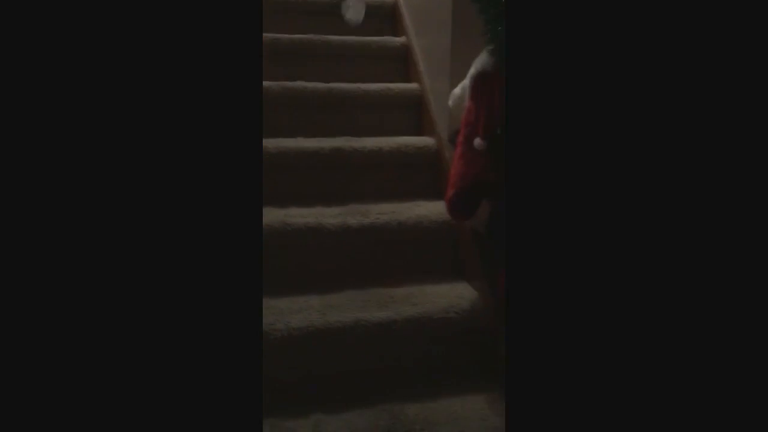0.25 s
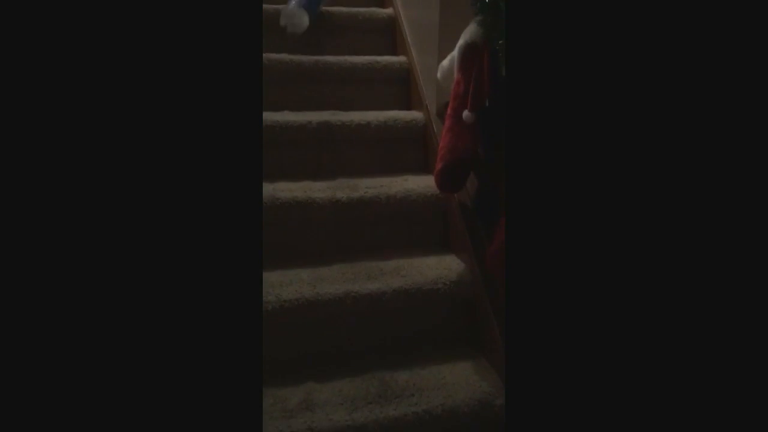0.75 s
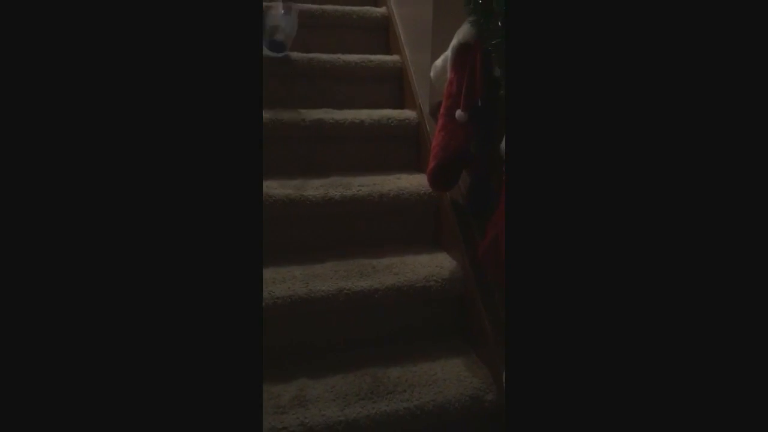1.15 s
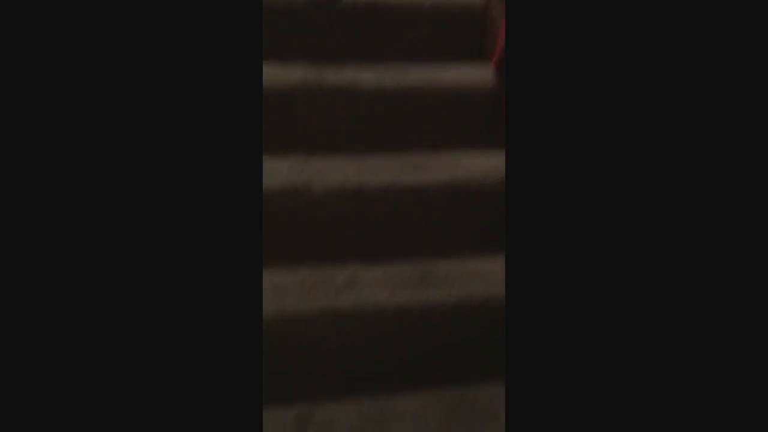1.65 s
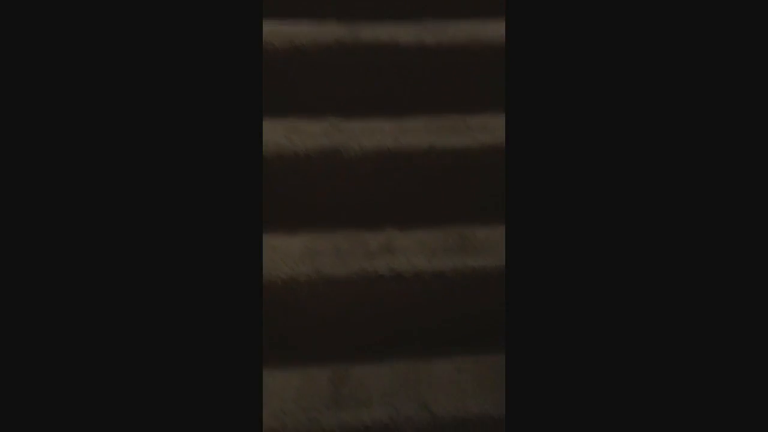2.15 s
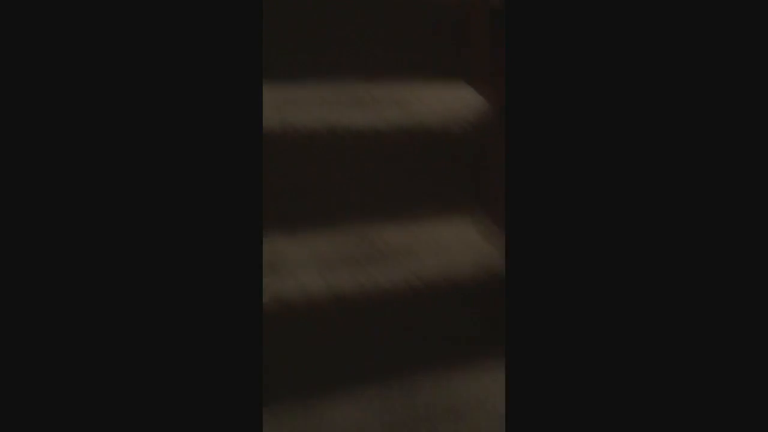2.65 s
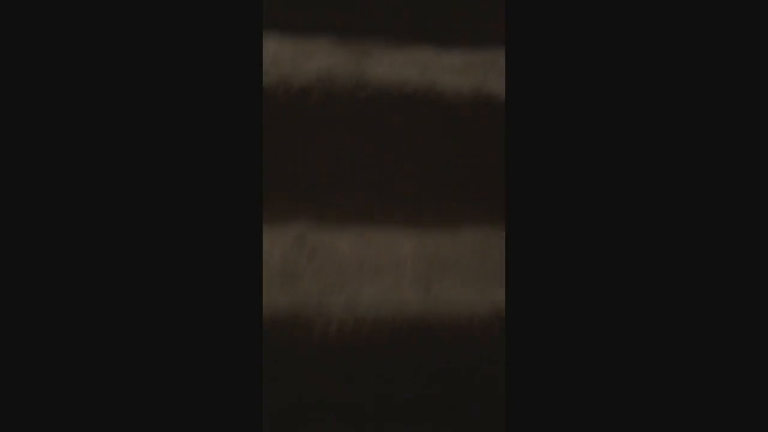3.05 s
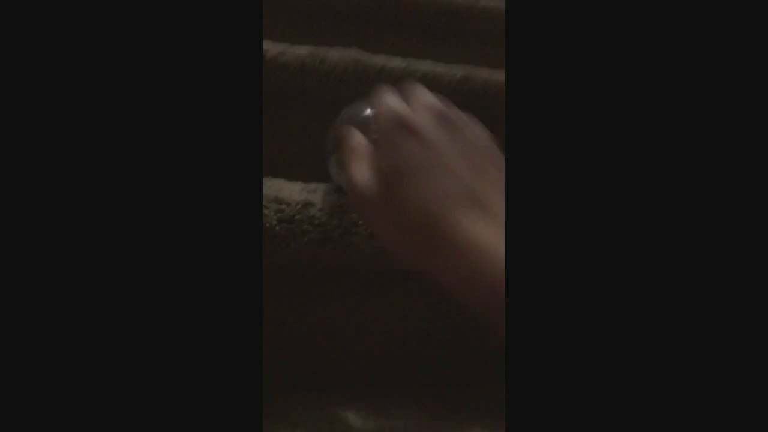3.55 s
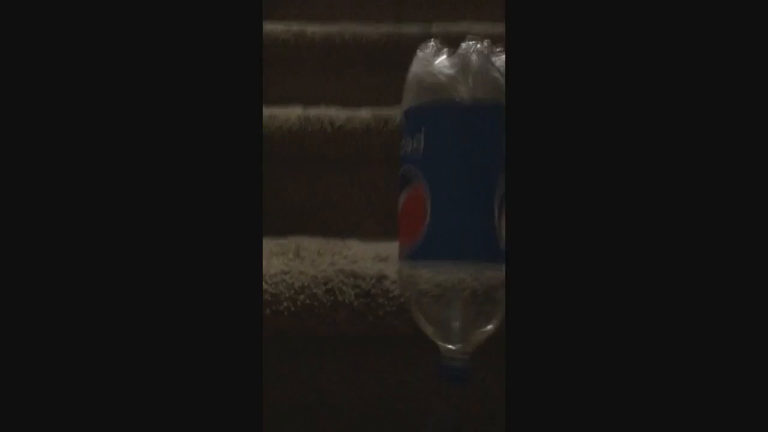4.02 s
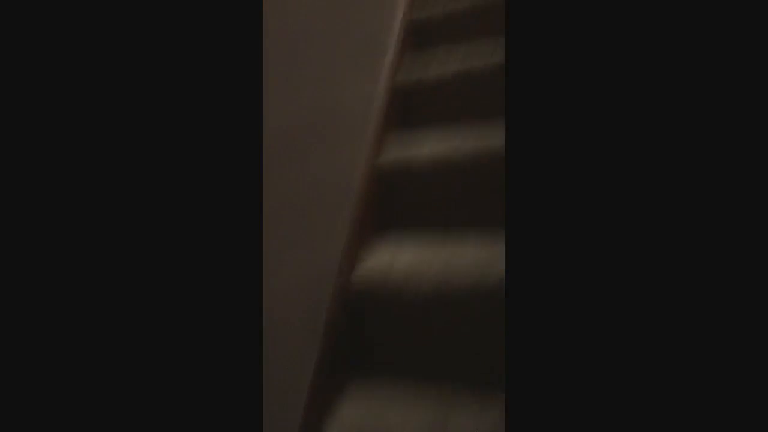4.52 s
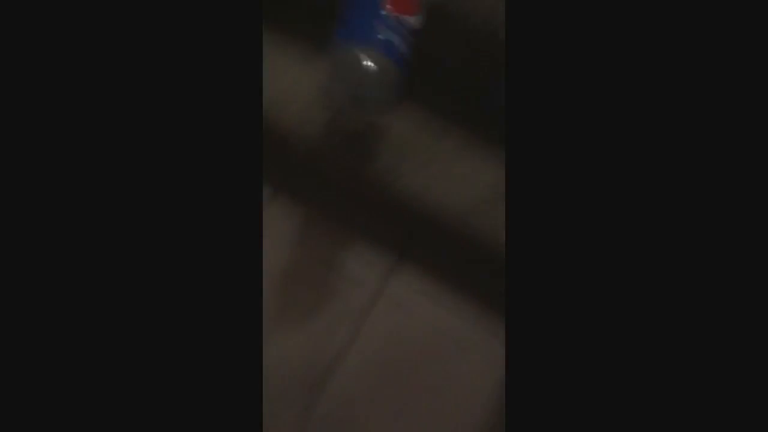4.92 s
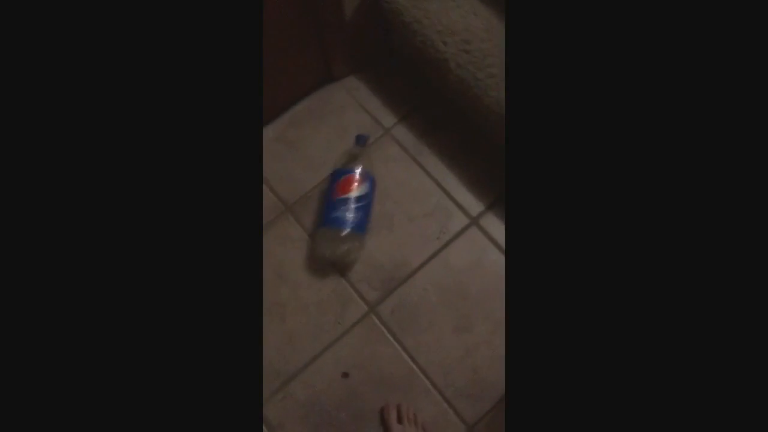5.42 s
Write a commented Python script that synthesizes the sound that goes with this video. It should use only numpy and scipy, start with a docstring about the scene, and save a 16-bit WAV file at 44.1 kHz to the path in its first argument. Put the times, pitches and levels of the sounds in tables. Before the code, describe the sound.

A part-filled plastic bottle tumbles down carpeted wooden stairs with soft, hollow bumps and faint sloshes. Bare feet thud up a few steps, making the staircase rumble. The bottle is grabbed with a sharp crackle and thrown down again, knocking and sloshing over the steps before hitting tile with two loud smacks. The microphone is close and hand-held, in a quiet house.

```python
"""A carpeted wooden staircase in a quiet house. A part-filled plastic bottle tumbles down; bare feet
climb after it, scuffing the carpet, a hand grabs it, and it is thrown down again to land on tiles.
Each impact excites damped modes of the treads, the hollow beneath and the bottle wall, and leaves the
stairs rumbling. The liquid slaps, runs back and traps bubbles that resonate. Cloth brushes past the
hand-held microphone, and the sharper sounds reverberate in the stairwell."""
import sys
import numpy as np
from scipy import signal
from scipy.fft import rfft, irfft
from scipy.io import wavfile
from scipy.ndimage import uniform_filter1d

SR = 44100
rng = np.random.default_rng(int(sys.argv[2]) if len(sys.argv) > 2 else 0)


def pcm_store(signal):
    """Save signal as 16-bit PCM."""
    levels = np.round(np.clip(np.atleast_2d(signal), -1, 1) * 32767)
    wavfile.write(sys.argv[1], SR, levels.astype(np.int16).T)


N = 250488

# blows of bottle and feet: t/s, tread peak/dB, tread f/Hz, t60/s, hollow peak/dB, hardness (0-1)
BLOWS = [(0.0, -49, 77.5, .11, -30.5, 0.67), (0.046, -32, 59.6, 0.051, -35, 0.64),
         (0.382, -23, 72.5, 0.13, -42, 0.4), (0.688, -42, 58.6, 0.18, -70, 0.56),
         (0.922, -23, 67, 0.25, -40, 0.62), (1.365, -19.5, 84, 0.07, -21, 0.34),
         (1.49, -38, 70.4, 0.088, -42, 0.3), (2.497, -47.5, 106, 0.074, -48, 0.8),
         (2.67, -37, 135, 0.18, -52, 0.2), (2.757, -11.5, 86.6, 0.071, -28, 0.28),
         (2.806, -22.5, 89.5, 0.12, -49, 0.8), (2.837, -25.5, 67.4, 0.31, -53, 0.7),
         (3.306, -39, 54, 0.075, -61, .45), (3.406, -24, 51.3, 0.33, -37, 0.35),
         (3.435, -18, 45, 0.42, -33.5, 0.75), (3.456, -16.5, 59.6, 0.043, -33, .45),
         (3.769, -24, 58.6, 0.17, -52, 0.47), (4.106, -57, 51.1, .12, -31, 0.94),
         (4.335, -30, 92.7, 0.19, -27.5, 0.2), (4.35, -20, 101, .081, -27.5, 0.65),
         (4.403, -4.5, 110, 0.053, -18, 0.94), (4.441, -25.5, 117, 0.063, -30.5, 0.2),
         (4.52, -30.5, 50.3, .15, -59, 0.24), (4.645, -23, 105, 0.077, -41, 0.53),
         (4.7, -28.5, 82, 0.044, -42, 0.9), (4.727, -22, 116, 0.079, -17.5, 0.22),
         (4.768, -24.5, 75, 0.21, -28, 0), (4.827, -26, 87, 0.052, -31, .45),
         (4.9, -40, 57.3, 0.072, -25.5, 0.8), (4.923, -19.5, 106, 0.038, -32, .55),
         (4.951, -17, 86, 0.039, -39, .03), (4.996, -24, 83.7, 0.15, -52, 0.76),
         (5.111, -20, 91, 0.045, -23, .7), (5.2728, -15, 100.3, 0.36, -11, 0.43),
         (5.382, -13, 111.4, 0.11, -15, 0.85), (5.518, -34, 108.6, 0.45, -41, 0.43),
         (5.592, -32, 94, 0.34, -44, 0.8)]
# liquid slaps in the bottle and feet scuffing the carpet: t/s, level/dB, t60/s, tilt/(dB per octave)
SLAPS_AND_SCUFFS = [(0.049, -37.5, 0.2, -3), (.078, -43.5, 0.47, -1.5), (.39, -41, 0.63, -0.25),
                    (.687, -47, 0.22, -5), (0.829, -51, 0.36, 3), (0.9291, -39.5, 0.59, -.5),
                    (1.1685, -54, 0.16, 0), (1.229, -56, 0.11, 4), (1.3648, -45.5, 1, 3),
                    (1.5042, -46, 0.19, 2), (1.5431, -46.5, 0.1, 1.5), (1.644, -39.5, 0.025, 1),
                    (1.7645, -45.5, 0.096, 4.5), (1.8587, -45, 0.024, 2.5), (2.7655, -50.5, 0.13, 2),
                    (3.2962, -46, .058, 3.5), (3.428, -50, .1, 1.2), (3.494, -53, 0.2, 2),
                    (3.8, -46.5, 0.13, 3), (4.0062, -55.5, .32, 6), (4.0557, -24.5, .13, 2),
                    (4.105, -26, 0.084, 1.5), (4.1909, -48, 0.16, -5), (4.2168, -38, 0.17, -0.5),
                    (4.2972, -42.5, .25, -0.5), (4.4009, -17, 0.082, -5.5), (4.4578, -44, 0.13, 4),
                    (4.6494, -26, .11, -2), (4.709, -35.5, 0.14, -0.5), (4.735, -27.5, .36, -1.1),
                    (5.1173, -34.5, 0.57, 2.5), (5.218, -29.5, .06, 3), (5.2762, -12, 0.12, -7),
                    (5.3798, -11.5, 0.063, 0.6), (5.5149, -26, 0.052, 6), (5.5792, -35.5, 0.17, 1),
                    (5.6226, -34.5, 0.041, -0.3), (5.6542, -38.5, 0.069, -4.5)]
# spectrum of moving liquid and brushed carpet: f/Hz, relative level/dB
SWISH_SPECTRUM = [(180, -4.5), (300, -8.5), (663, -10.5), (781, -7), (1140, -8.5), (1300, -9.5),
                  (2070, -10), (2830, -10.5), (4880, -15.5), (5950, -13.5), (7750, -19), (12700, -25),
                  (15500, -25.5)]


def gain_of(db):
    """Amplitude ratio of a level in dB."""
    return 10 ** (np.asarray(db) / 20)


def unit_rms(x):
    """Normalisation to unit mean power."""
    return x / np.sqrt(np.mean(x ** 2) + 1e-20)


def at_frequency(points, hz):
    """Interpolation of a table on a logarithmic frequency axis."""
    f, value = np.transpose(points)
    return np.interp(np.log(hz + 1), np.log(f + 1), value)


def add(mix, s, db, sound):
    """Superposition: the sound enters the mix at s seconds with peak level db."""
    part = mix[max(round(s * SR), 0):][:len(sound)]
    part += gain_of(db) * sound[:len(part)] / np.abs(sound).max()


def coloured_noise(spectrum):
    """Spectral shaping of white noise, at unit rms."""
    white = rfft(rng.standard_normal(N))
    return unit_rms(irfft(white * gain_of(at_frequency(spectrum, np.fft.rfftfreq(N, 1 / SR))), N))


def decaying_power(s, db, t60):
    """Incoherent addition: the powers of exponential decays starting at the times s are summed."""
    starts = np.zeros(N)
    np.add.at(starts, np.round(np.asarray(s) * SR).astype(int), gain_of(db) ** 2)
    return signal.lfilter([1], [1, -gain_of(-2 * 60 / (t60 * SR))], starts)


def house_hush():
    """Ambient noise: a stationary floor, strongest in the deep bass."""
    # spectrum of the quiet house: f/Hz, relative level/dB
    spectrum = [(12, -30), (20, 18), (70, -18), (282, -4), (427, -15), (519, -11), (1500, -21), (2150, -22),
                (4810, -28), (5850, -25), (10500, -28), (13100, -23), (15500, -32)]
    return gain_of(-63) * coloured_noise(spectrum)


def stairwell(x):
    """Reverberation: sparse reflections of random sign, each band decaying at its own rate."""
    # reverberation time: f/Hz, t60/s
    decay_times = [(200, 0.08), (1000, 0.39), (4000, 0.28), (12000, 0.35)]
    reflections = np.zeros(SR // 2)
    slots = np.arange(150, SR // 2 - 20, 20)
    arrivals = slots + rng.integers(0, 20, len(slots))
    reflections[arrivals] = rng.choice([-1., 1.], len(slots))
    hz, t, bands = signal.stft(reflections, SR, nperseg=256)
    decay = gain_of(-60 * t / at_frequency(decay_times, hz)[:, None])
    tail = signal.istft(bands * decay, SR, nperseg=256)[1]
    return signal.fftconvolve(x, tail / np.linalg.norm(tail))[:N]


def cloth_rustle():
    """Friction noise: cloth brushing close by swells and fades with each stroke."""
    # strokes: t/s of the peak, level/dB, swell/s, fade/s
    strokes = [(2.3, -64.5, 0.087, 0.076), (3.02, -70.5, 0.048, 0.06), (3.51, -61.5, .015, 0.039)]
    # spectrum of rubbing cloth: f/Hz, relative level/dB
    spectrum = [(180, -17), (1500, -3), (2200, 8), (2700, -6), (3400, 4), (4600, -24), (6500, -3),
                (15500, -20.5)]
    t = np.arange(N) / SR
    envelope = sum(gain_of(db) * np.exp(-((t - s) / np.where(t < s, swell, fade)) ** 2)
                   for s, db, swell, fade in strokes)
    return envelope * coloured_noise(spectrum)


def stair_rumble():
    """Forced vibration: moving weight and blows shake the stairs, a light load at a higher pitch."""
    # rumble under moving weight, blows aside: t/s, level/dB
    loading = [(0.0, -32.5), (.19, -57.5), (1.1, -61.5), (1.5, -41), (1.71, -59.5), (1.96, -58.5),
               (2.7, -54), (3.32, -54), (3.64, -49.5), (3.81, -55.5), (4.38, -53.5), (4.6, -48),
               (4.87, -33), (4.97, -47), (5.09, -35.5), (5.24, -41), (5.51, -66), (5.68, -34.5)]
    # response to a heavy load: f/Hz, relative level/dB
    heavy_spectrum = [(12, -14), (20, 5), (59, 13.5), (119, -8), (223, -14), (392, -39), (435, -11),
                      (483, -60), (700, -27), (910, -61), (1540, -120)]
    # response to a light load: f/Hz, relative level/dB
    light_spectrum = [(12, -51), (20, -15.5), (87, 2), (112, -5.5), (130, -15), (161, -6), (195, -20),
                      (353, -19.5), (700, -44.5), (910, -41), (1540, -120)]
    heavy_hz, light_hz = 49.7, 154  # a blow's tread note divides its power between the two spectra
    s, db, hz = np.transpose(BLOWS)[:3]
    light = np.clip(np.log(hz / heavy_hz) / np.log(light_hz / heavy_hz), 1e-3, 1 - 1e-3)
    load_power = gain_of(np.interp(np.arange(N) / SR, *np.transpose(loading))) ** 2
    out = np.zeros(N)
    for blow_share, load_share, spectrum in ((1 - light, 0.56, heavy_spectrum),
                                             (light, 0.44, light_spectrum)):
        blow_power = decaying_power(s, db - 23 + 10 * np.log10(blow_share), t60=0.74)
        power = load_share * load_power + uniform_filter1d(blow_power, size=900)
        out += np.sqrt(abs(power)) * coloured_noise(spectrum)
    return out


def grainy_hiss(per_s, spread_db):
    """Shot noise over hiss: tiny grains of uneven size arrive at random; some ring on like bubbles."""
    sizes = gain_of(spread_db * np.minimum(rng.exponential(1, N), 3.5))
    impacts = sizes * (rng.random(N) < per_s / SR)
    band, out = rng.integers(0, 48, N), np.zeros(N)
    for k, hz in enumerate(np.geomspace(900, 14000, 48)):
        cycles = 7.0 if k % 4 == 0 and hz < 5500 else 1.1
        t = np.arange(round(4 * cycles * SR / hz)) / SR
        chirp = np.sin(2 * np.pi * hz * t * (1 + 0.0057 * hz * t))
        grain = chirp * np.exp(-hz * t / cycles) * np.minimum(hz * t, 1) * hz / 3000
        out += signal.oaconvolve(impacts * (band == k), grain)[:N]
    return 0.37 * unit_rms(out) + rng.standard_normal(N)


def swish_timbre(x, tilt_db, patchy_db):
    """Time-varying filtering: the swish spectrum, tilted in dB per octave, with drifting patches."""
    hz, t, frames = signal.stft(x, SR, nperseg=512, noverlap=384)
    patches = uniform_filter1d(rng.standard_normal(frames.shape), size=6, axis=0)
    patches = unit_rms(uniform_filter1d(patches, size=10, axis=1))
    tilt = np.interp(t, np.arange(len(x)) / SR, tilt_db * np.ones(len(x)))
    octaves = np.log2((hz[:, None] + 200) / 4000)
    shape_db = at_frequency(SWISH_SPECTRUM, hz)[:, None] + octaves * tilt + patchy_db * patches
    return signal.istft(frames * gain_of(shape_db), SR, nperseg=512, noverlap=384)[1][:len(x)]


def swish():
    """Flow and friction noise: liquid runs and carpet is brushed; each slap or scuff leaves a tail."""
    # moving liquid and brushed carpet: t/s, level/dB, tilt/(dB per octave)
    movement = [(0.0, -57, 2), (.3, -67, 0.5), (.8, -74, 0.5), (1.1, -67.5, -1.5), (1.24, -53.5, -0.5),
                (1.36, -66, -1), (1.45, -53.5, 2.5), (1.7, -56.5, -3.5), (1.9, -60.5, 1.9), (1.96, -77, 7),
                (2.31, -58.5, 7), (2.44, -72.5, 1), (3.24, -69, 0.5), (3.3, -55, -5), (3.34, -87, 7),
                (3.39, -70, -4.5), (3.43, -60, -2), (3.7, -72.5, 2), (3.94, -81, 5.5), (4.052, -42.5, -1.5),
                (4.13, -52.5, 3.3), (4.39, -52, -1.5), (4.478, -33.5, 2), (4.599, -61, 0.5),
                (4.7, -40.5, 3), (4.88, -54, 3.5), (5.04, -50.5, 6.5), (5.11, -57, 0.5), (5.18, -37, 2.5),
                (5.22, -46.5, -2.5), (5.36, -52, -2), (5.57, -48, 1.5), (5.68, -53.5, -0.5)]
    s, db, tilt_db = np.transpose(movement)
    burst_s, burst_db = np.transpose(SLAPS_AND_SCUFFS)[:2]
    t = np.arange(N) / SR
    noise = swish_timbre(grainy_hiss(per_s=3800, spread_db=3.5), np.interp(t, s, tilt_db), patchy_db=-1)
    power = gain_of(np.interp(t, s, db)) ** 2 + decaying_power(burst_s, burst_db - 13.5, t60=0.21)
    return noise * np.sqrt(power / (uniform_filter1d(noise ** 2, size=8000) + 1e-12))


def slaps_and_scuffs():
    """Inertia and friction: liquid slaps in the bottle and feet scuff the carpet, in decaying bursts."""
    out, t = np.zeros(N), np.arange(SR // 3) / SR
    hiss = grainy_hiss(per_s=5000, spread_db=2.0)
    for s, db, t60, tilt_db in SLAPS_AND_SCUFFS:
        grains = np.resize(hiss[round(s * SR / 2):], len(t))
        burst = unit_rms(swish_timbre(grains, tilt_db, patchy_db=4.0))
        rise_s = 0.0012 * np.exp(-0.03 * db)  # weaker bursts rise more slowly
        envelope = gain_of(db - 60 * t / t60) * np.minimum(t / rise_s, 1)
        start = round(s * SR)
        out[start:][:len(t)] += (burst * envelope)[:N - start]
    return out


def bubbles():
    """Bubble resonance: trapped air pulsates in a short rising note, blurred by a smaller neighbour."""
    # single bubbles: t/s, peak level/dB, starting f/Hz
    notes = [(0.0638, -33, 1600), (0.3563, -50, 2580), (0.849, -50.5, 925), (0.9444, -34, 1940),
             (1.139, -42.5, 1990), (1.172, -41.5, 1410), (1.2268, -40, 1710), (1.3136, -43.5, 4350),
             (1.5075, -32.5, 2740), (3.4994, -52, 2200), (4.1924, -39.5, 1080), (4.3098, -31, 2470),
             (4.314, -31, 4140), (4.3247, -28.5, 1070), (4.608, -39, 1430), (5.239, -22, 1350)]
    out = np.zeros(N)
    for s, db, hz in notes:
        t = np.arange(round(40 * SR / hz)) / SR
        phase = 2 * np.pi * hz * t * (1 + 0.0041 * hz * t)
        pair = np.sin(phase) + 0.34 * np.sin(1.186 * phase)
        add(out, s, db, pair * np.exp(-hz * t / 3.4) * (1 - np.exp(-hz * t / 0.68)))
    return out


def snaps():
    """Transient excitation: a click and a noise burst drive a resonance of plastic, joint or grit."""
    # hard snaps: t/s, peak level/dB, centre f/Hz, quality factor Q
    cracks = [(0.0752, -25.5, 4450, 12), (0.3882, -33.5, 1310, 2.4), (0.926, -33.5, 1960, 0.85),
              (1.3666, -31.5, 2140, 12), (1.912, -39, 3020, 0.38), (2.4638, -31, 1360, 0.77),
              (2.7755, -23.5, 1290, 0.29), (2.9062, -20.5, 6440, 0.49), (3.3132, -30, 1800, .73),
              (3.4674, -38, 1300, 0.7), (3.4773, -24, 1350, 0.49), (3.7154, -35.5, 1210, 3.3),
              (3.7982, -33, 2640, 8.8), (4.0622, -15.5, 6400, 7.2), (4.1107, -12, 4630, 0.63),
              (4.405, -18.5, 1300, 1.7), (4.419, -13, 1280, 0.9), (4.6406, -27.5, 1360, 2.3),
              (4.7338, -15, 3040, 3), (4.9016, -15.5, 3260, 0.67), (4.9262, -12.5, 3670, 0.67),
              (4.9313, -9, 3020, 0.25), (4.9363, -11.5, 1300, 0.39), (5.124, -20.5, 6700, 1.7),
              (5.2777, -1, 1540, 0.5), (5.381, -3, 1520, 0.77), (5.5159, -27, 1500, 1.24)]
    out, t = np.zeros(N), np.arange(2048) / SR
    for s, db, hz, q in cracks:
        t60 = 0.0087 + 3 * q / hz
        drive = (rng.standard_normal(len(t)) + 5.3 * (t == 0)) * gain_of(-60 * t / t60)
        q = max(q, .3)
        ring = signal.lfilter(*signal.iirpeak(hz, q, SR), drive)
        bright_edge = 0.067 / q ** 2 * np.diff(drive, prepend=0)
        add(out, s, db, ring + bright_edge)
    return out


def knocks():
    """Damped inharmonic modes: the bottle wall or tread edge rings for a few cycles."""
    # hollow knocks: t/s, peak level/dB, f/Hz, t60/s
    contacts = [(0.0, -29, 251, 0.1), (0.02, -40, 270, 0.13), (1.366, -26.5, 246, 0.074),
                (2.395, -39.5, 225, 0.027), (2.436, -41, 248, 0.039), (2.465, -32, 275, 0.029),
                (3.301, -30, 403, 0.019), (3.314, -26, 259, 0.016), (3.478, -21, 374, 0.022),
                (3.718, -24.5, 343, 0.014), (3.997, -39.5, 330, 0.027), (4.107, -32, 902, 0.018),
                (4.234, -30.5, 333, 0.036), (4.397, -8.5, 261, 0.039), (4.418, -8.5, 355, 0.028),
                (4.492, -29, 783, 0.018), (4.638, -22, 552, 0.015), (4.655, -24.5, 304, 0.034),
                (4.7347, -21, 213, 0.08), (4.9, -16, 463, 0.011), (4.932, -22, 280, 0.027),
                (5.03, -26.5, 336, 0.018), (5.114, -33, 275, 0.048), (5.277, -7.5, 963, 0.02),
                (5.385, -17.5, 985, 0.058), (5.672, -34.5, 320, 0.03)]
    partials = ((1, 1), (1.586, 0.5), (0.664, 0.41))  # frequency ratio, relative amplitude
    out, t = np.zeros(N), np.arange(SR // 8) / SR
    for s, db, hz, t60 in contacts:
        note = sum(gain * np.sin(2 * np.pi * ratio * hz * t) for ratio, gain in partials)
        add(out, s, db, note * gain_of(-60 * t / t60) * np.minimum(t / 0.0011, 1))
    return out


def tread_thuds():
    """Cushioned impact: the tread swings under the carpet; a harder blow excites higher hollow modes."""
    # modes of the hollow of stair and bottle: f/Hz, relative level/dB, t60/s
    hollow_modes = [(163, 4, 0.24), (191.5, 0.5, 0.25), (226.9, 1, 0.21), (296, -4.5, 0.16),
                    (360, -3.5, 0.19), (416, -27, 0.34), (509, -14, 0.29), (688, -16, 0.1),
                    (1002, -17.5, 0.2), (1290, -30, 0.11), (1430, -28, 0.4), (1980, -25, 0.11)]
    soft_rise_s, hard_rise_s = 0.023, 0.00202
    soft_tilt_db, hard_tilt_db = -8, 3  # per octave, across the modes
    out, t = np.zeros(N), np.arange(SR // 2) / SR
    mode_hz, mode_db, mode_t60 = np.transpose(hollow_modes)[:, :, None]
    polarity = (-1) ** np.arange(len(mode_hz))[:, None]
    modes = polarity * gain_of(mode_db - 60 * t / mode_t60) * np.sin(2 * np.pi * mode_hz * t)
    for s, db, hz, t60, hollow_db, hardness in BLOWS:
        rise_s = soft_rise_s * (hard_rise_s / soft_rise_s) ** hardness
        swing = -np.sin(2 * np.pi * hz * t) * gain_of(-60 * t / t60)
        add(out, s, db, swing * (1 - np.exp(-(t / rise_s) ** 2)))
        add(out, s, db - 11, np.hanning(900))  # the slow push of the weight
        tilt_db = soft_tilt_db + (hard_tilt_db - soft_tilt_db) * hardness
        hollow = (gain_of(tilt_db * np.log2(mode_hz / mode_hz[0])) * modes).sum(axis=0)
        add(out, s, hollow_db, hollow * np.minimum(t / 0.0028, 1))
    return out


def scene():
    """Superposition of the direct sounds and the reverberation of the sharp and swishing ones."""
    sharp = knocks() + snaps() + bubbles()
    swishing = swish() + slaps_and_scuffs()
    echoes = stairwell(gain_of(-16) * sharp + gain_of(-16.5) * swishing)
    mix = tread_thuds() + sharp + swishing + echoes + cloth_rustle() + stair_rumble() + house_hush()
    return mix[None]


def record(dry):
    """Band limiting: the microphone drops the deepest bass, and a low-pass cuts the highest treble."""
    low_hz, high_hz = 42, 15300
    thinned = signal.sosfilt(signal.butter(3, low_hz, "high", fs=SR, output="sos"), dry)
    low_pass = signal.firwin(511, high_hz, window=("kaiser", 9), fs=SR)
    return signal.oaconvolve(thinned, low_pass[None], "same")


dry = scene()
out = record(dry)
pcm_store(out)
```